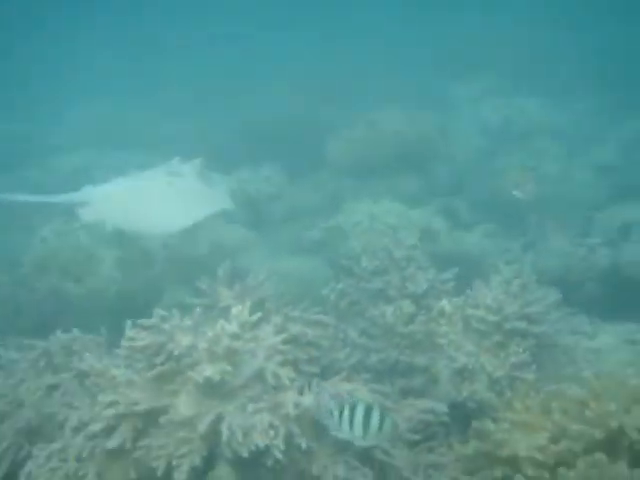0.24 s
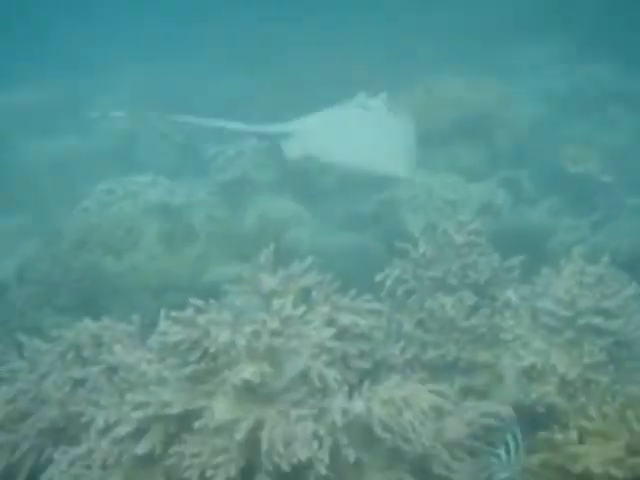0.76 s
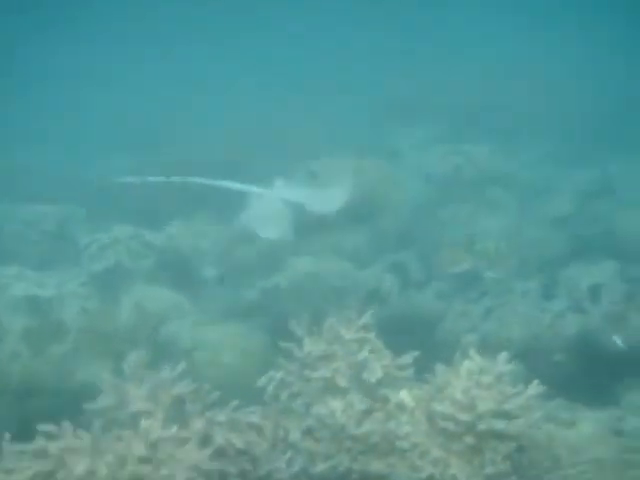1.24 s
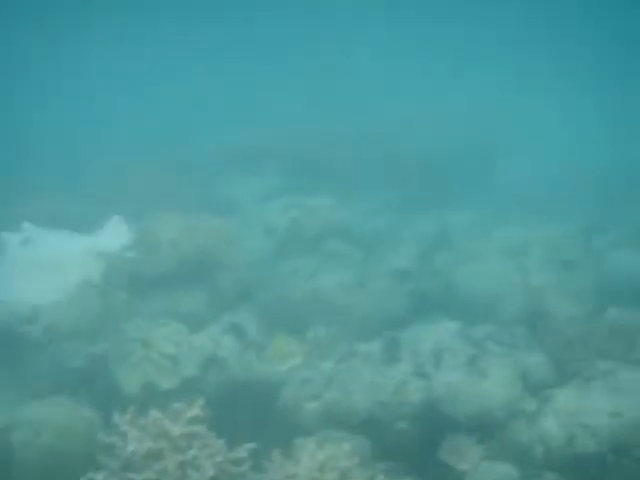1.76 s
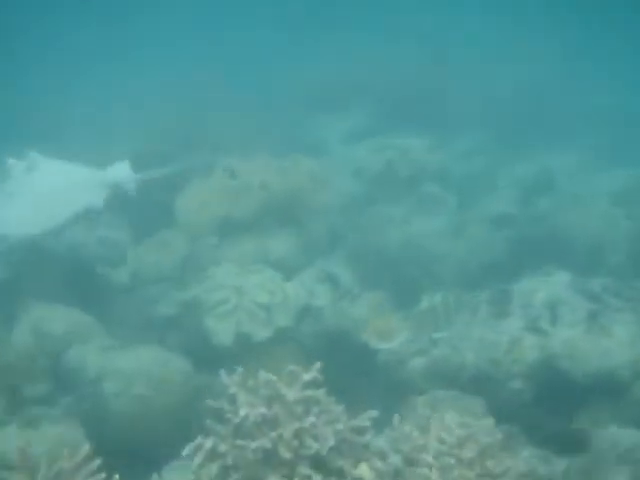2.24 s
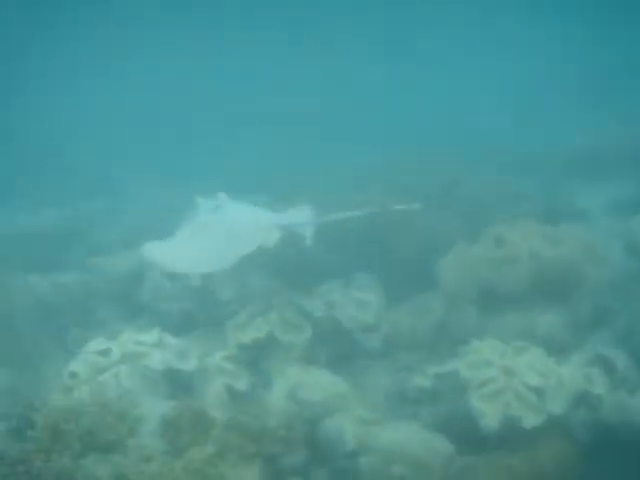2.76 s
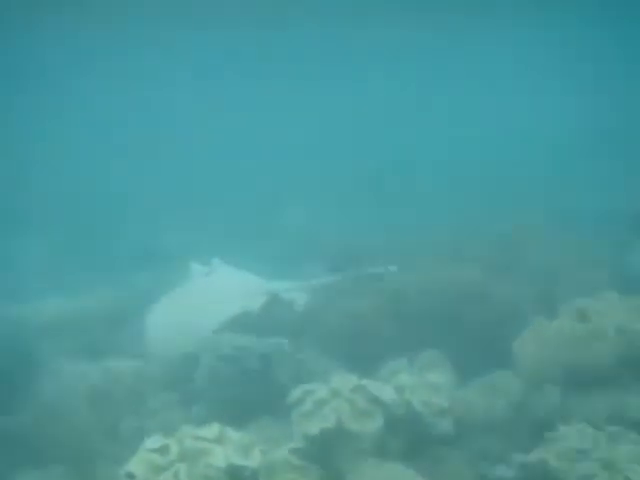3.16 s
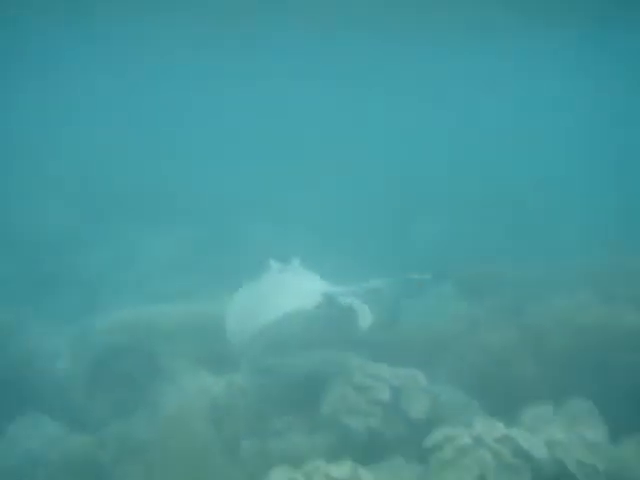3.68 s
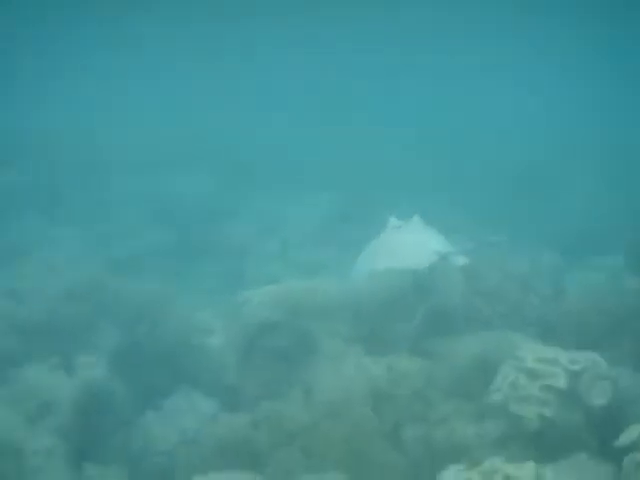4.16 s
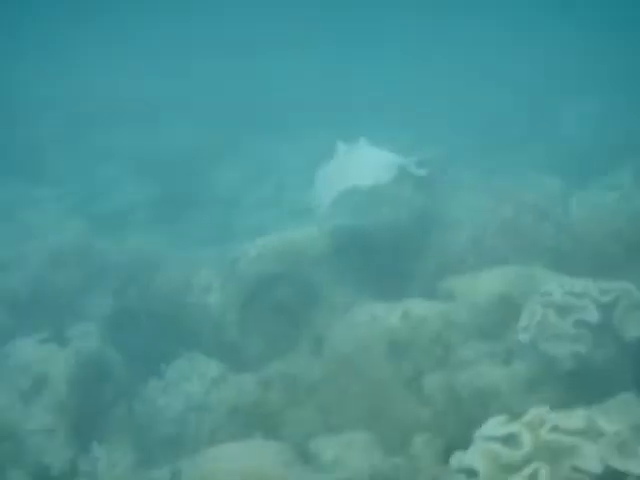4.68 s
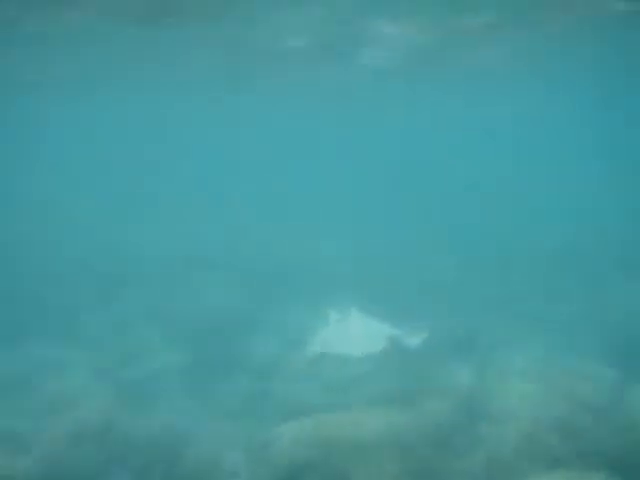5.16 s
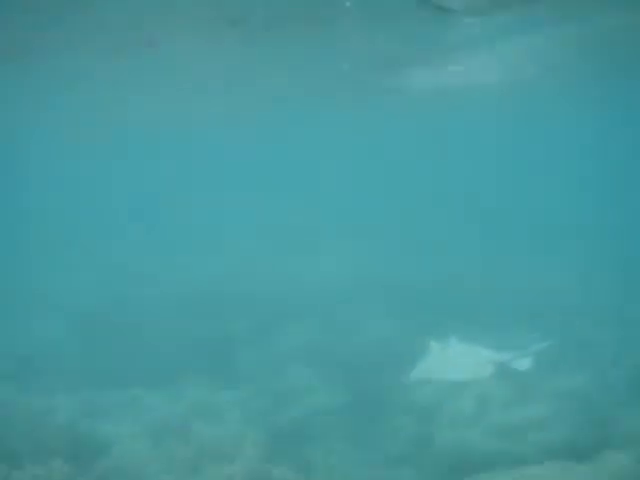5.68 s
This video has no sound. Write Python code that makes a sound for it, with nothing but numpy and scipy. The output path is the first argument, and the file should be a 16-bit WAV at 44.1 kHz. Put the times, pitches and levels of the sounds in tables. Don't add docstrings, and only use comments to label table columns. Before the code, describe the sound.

Dull low water noise surges around an enclosed underwater microphone, broken by soft thuds, bubbly plops, tiny snaps and a faint high whine.

```python
import sys
import numpy as np
from scipy import signal
from scipy.fft import rfft, irfft, next_fast_len
from scipy.io import wavfile
from scipy.ndimage import uniform_filter1d, minimum_filter1d, map_coordinates

SR = 44100
rng = np.random.default_rng(int(sys.argv[2]) if len(sys.argv) > 2 else 0)


def generate_wav(signal):
    frames = np.transpose(np.atleast_2d(signal))
    scaled = np.clip(frames, -1, 1) * 32767
    pcm = np.round(scaled).astype(np.int16)
    wavfile.write(sys.argv[1], SR, pcm)


def volts(x):
    e = np.asarray(x, float) / 20
    return 10 ** e


N = 261072


def unit(x):
    return x / np.sqrt(np.mean(x ** 2) + 1e-20)


def noise():
    return rng.standard_normal(N)


def curves(rows):
    s, *cols = np.transpose(rows)
    return [np.interp(np.arange(N) / SR, s, c) for c in cols]


def wobble(rate):
    knots = rng.standard_normal(int(N * rate / SR) + 4)
    return map_coordinates(knots, [np.arange(N) * rate / SR])


def filtered(x, response):
    m = next_fast_len(N + SR // 2)
    return irfft(rfft(x, m) * response(np.fft.rfftfreq(m, 1 / SR)), m)[:N]


def coloured(x, spectrum):
    f, db = np.transpose(spectrum)
    return unit(filtered(x, lambda hz: volts(np.interp(np.log(hz + 1), np.log(f), db))))


def resonant(x, modes):
    def response(f):
        total = 0
        for k, (centre, width, db) in enumerate(modes):
            damping = 1j * f * width
            total = total + (-1) ** k * volts(db) * damping / (centre * centre - f * f + damping)
        return total
    return unit(filtered(x, response))


def pushes(rate, spread_db):
    struck = rng.random(N) < rate / SR
    return unit(struck * noise() * volts(spread_db * rng.exponential(size=N)))


def rings(rows, rough=0.):
    lead = SR // 20
    out, waver = np.zeros(N + SR), np.pad(wobble(160), (0, SR))
    for row in rows:
        s, db, hz, t60, rise, bend, hold = (*row, 0, 0)[:7]
        t60, rise = np.clip(t60, 1 / 300, 1 / 3), np.clip(rise, 1 / 5000, 1 / 21)
        k = np.arange(-int(rise * SR), int((t60 + hold) * SR))
        t, at = k / SR, round(s * SR) + k
        shake = rough * waver[at + lead]
        swell = np.sin(np.pi / 2 * np.clip(1 + t / rise, 0, 1)) ** 2 * np.exp(6 * shake)
        decay = volts(db - 60 * np.maximum(t - hold, 0) / t60)
        pitch = hz * np.exp(np.clip(bend * t, -.5, .5) + shake)
        out[at + lead] += decay * swell * np.sin(2 * np.pi * np.cumsum(pitch) / SR)
    return out[lead:lead + N]


def necked(rows, rise_cycles):
    return [(s, db, hz, t60, rise_cycles / hz, bend) for s, db, hz, t60, bend in rows]


def popped(rows, bend):
    rise_1khz_s, size_law = 0.003514, 0.553
    return [(s, db, hz, t60, rise_1khz_s * (1000 / hz) ** size_law, bend) for s, db, hz, t60 in rows]


def swarm(count, low_hz, span_db, cycles):
    s, size, strength, glide = rng.random((count, 4)).T
    hz = low_hz * volts(span_db * size)
    rows = [s * N / SR, -14 * strength, hz, cycles / hz, 2.2 / hz, 40 * (glide - .5)]
    return unit(rings(np.transpose(rows)))


def patchy(x, depth_db):
    z = signal.stft(x, nperseg=512)[2]
    field = uniform_filter1d(rng.standard_normal(z.shape), size=7, axis=0)
    field = uniform_filter1d(field, size=30, axis=1)
    return signal.istft(z * volts(depth_db * unit(field)), nperseg=512)[1][:N]


# t/s, level/dB
SURGE = [(0.0, -42.5), (0.16, -44), (0.71, -34.5), (1.07, -41.5), (1.4, -45.5), (1.75, -48.5),
         (1.93, -43.5), (2.32, -44), (2.77, -43), (3.2, -49), (3.64, -46.5), (4.07, -39.5), (4.44, -44.5),
         (4.58, -37), (5.06, -41.5), (5.38, -37.5), (5.55, -38), (5.92, -41)]
# f/Hz, width/Hz, level/dB
CAVITY = [
    (388.2, 38.9, 7.5),
    (195, 78, -1.5),
    (275, 280, -30),
    (490, 74, -31),
]
# peak t/s, level/dB, f/Hz, t60/s
KNOCKS = [(0.205, -20.5, 325, 0.047), (0.158, -22, 340, 0.0053), (0.433, -28, 393, 0.026),
          (0.639, -22.5, 397, 0.085), (0.789, -14, 366, 0.09), (0.845, -18.5, 365, 0.11),
          (1.344, -24, 362.5, 0.25), (1.733, -16.5, 370, 0.094), (2.018, -16, 375, 0.017),
          (2.036, -15.5, 383, .035), (2.088, -7.5, 382, 0.055), (2.102, -11.5, 378, 0.067),
          (2.145, -20, 392, .03), (2.158, -15.5, 382, 0.08), (2.912, -23, 380, 0.046),
          (3.394, -20.5, 385, 0.088), (3.908, -21.5, 388, 0.04), (3.928, -14.5, 392, 0.024),
          (3.996, -19, 354, 0.078), (4.024, -22.5, 385, 0.029), (4.398, -21, 266, 0.11),
          (4.423, -22, 333, 0.021), (4.461, -11, 410, 0.018), (4.677, -26.5, 357, 0.098),
          (4.712, -17.5, 340, 0.038), (4.798, -20.5, 356, 0.092)]
# peak t/s, level/dB, f/Hz, t60/s, rise/s
SWELLS = [(1.087, -16.5, 200, .07, .007), (2.292, -25, 386, 0.047, 0.0068), (2.37, -22, 376, 0.046, .006),
          (5.877, -14.5, 360, 0.034, .007), (5.919, -21, 348, .05, 0.0075),
          (1.308, -15.5, 360, 0.024, .009), (0.117, -18.5, 363, 0.018, 0.007),
          (0.215, -21, 379, 0.065, 0.0049), (0.587, -33, 387, .026, .0213),
          (0.707, -18.5, 345, 0.095, 0.015), (0.74, -19, 360, 0.025, .0111),
          (0.891, -27.5, 348, 0.1, 0.016), (0.98, -24, 337, 0.015, 0.011),
          (2.481, -22.5, 391.6, 0.013, 0.035), (2.519, -17.5, 364, 0.042, 0.011),
          (3.593, -14.5, 363, 0.037, .012), (4.061, -8, 400, 0.014, 0.0073),
          (4.094, -19, 360, 0.054, 0.0095), (4.136, -11, 355, 0.04, 0.01327),
          (4.411, -28, 406.5, 0.14, 0.023), (4.49, -25, 397.4, 0.11, 0.014), (4.52, -23, 390, .05, 0.013),
          (4.7, -19, 372, 0.036, .012), (4.734, -28, 353, 0.019, .0134), (4.992, -23.5, 372, 0.036, .012),
          (5.24, -24.5, 401, 0.039, 0.026), (5.573, -34, 383, .047, 0.014), (5.748, -25, 385, 0.058, .0116)]


def air_space():
    boom_db, = curves(SURGE)
    drive = noise() * volts(.9 * wobble(14) + 1.9 * wobble(40))
    boom = volts(boom_db + 2.5) * resonant(resonant(drive, CAVITY), [(365, 370, 0)])
    knock_rise_s, give_way = 0.00441, .7
    blows = [(*row, knock_rise_s) for row in KNOCKS] + SWELLS
    struck = volts(-3.5) * rings(blows)
    filled = uniform_filter1d(abs(struck), size=300) / volts(boom_db)
    return boom / (1 + give_way * filled) + struck


CALM_DB = -42
# f/Hz, level/dB per Hz
SLOSH = [(12, -79.5), (20, -25), (70, -23.5), (124, -8), (200, -3.5), (247, -20.5), (300, 3.5), (390, -21),
         (660, -120)]


def slosh():
    level_db = -53.5 + 0.4 * (curves(SURGE)[0] - CALM_DB)
    return volts(level_db + 1.0) * unit(volts(1.2 * wobble(8.3)) * coloured(noise(), SLOSH))


# f/Hz, level/dB per Hz
FIZZ = [(290, -40.5), (500, -0.5), (765, -9.5), (1520, -7.5), (1980, -16), (2390, -6), (2740, -14),
        (3650, -16), (6020, -17.5), (7540, -14.5), (8130, -12), (8550, -19.5), (9930, -20.5),
        (12900, -64.5), (21800, -120)]
# f/Hz, width/Hz, level/dB
SHELL = [
    (2320, 230, 3.5),
    (3540, 420, 15.5),
    (6420, 1400, -3),
]
# t/s, level/dB
CRACKLE = [(0, -68.5), (1.05, -62), (1.4, -60), (1.75, -67), (1.99, -67.5), (2.3, -60), (2.69, -63),
           (3.33, -64), (3.8, -62.5), (4.3, -65.5), (4.6, -63), (4.88, -65.5), (5.2, -66), (5.92, -60.5)]


def reef_bed():
    fizz_db = -59 + 0.056 * (curves(SURGE)[0] - CALM_DB)
    flutter_db = .7 * wobble(12)
    hiss = volts(fizz_db + 3.0 + flutter_db) * coloured(noise(), FIZZ)
    ticks = pushes(rate=520, spread_db=1.1)
    crackle = volts(curves(CRACKLE)[0]) * resonant(ticks, SHELL)
    drifting = volts(.8 * wobble(2.5))
    return patchy(hiss + drifting * crackle, depth_db=1.7)


def drifting_bubbles():
    return volts(-65 + 2.5 * wobble(3.5)) * swarm(count=900, low_hz=1900, span_db=9, cycles=60)


def whine():
    whine_hz, frame_hz, rms_db = 8016, 30000 / 1001, -61.5
    since_frame = np.arange(N) / SR % (1 / frame_hz)
    return np.sqrt(2) * volts(rms_db) * np.sin(2 * np.pi * whine_hz * since_frame)


# peak t/s, level/dB, f/Hz, t60/s, pitch change/(1/s)
THUMPS = [(0.062, -26.5, 224, 0.023, -8), (0.539, -16, 325, 0.049, 2), (0.531, -48.5, 82, 0.14, 2),
          (0.633, -29, 195, 0.055, -6), (1.207, -55, 62, .193, 3), (1.493, -40.5, 147, 0.077, -8),
          (1.741, -27.5, 150, 0.075, 23), (1.837, -34.5, 178, 0.018, 5), (1.987, -41.5, 133, .33, -0.5),
          (2.103, -20, 253, 0.022, 0), (2.104, -35.5, 161, 0.17, 0), (2.292, -46.5, 77.7, 0.24, 21),
          (2.778, -38.5, 144, .22, -4), (3.397, -36, 136, 0.068, -13), (3.421, -49, 80, 0.37, 2.5),
          (3.87, -31.5, 172, 0.027, -10), (4.418, -24, 196, 0.1, -11.5), (4.589, -35.5, 115, 0.053, 1),
          (4.864, -30.5, 178, 0.048, 8), (4.977, -47.5, 70, .33, -1), (5.62, -42, 195, 0.25, -4.5),
          (5.75, -42, 180, 0.27, 1)]
# peak t/s, level/dB, f/Hz
LUMPS = [(0.175, -35.5, 227), (0.502, -24.5, 360), (0.572, -37, 544), (1.014, -37, 190), (1.29, -27.5, 370),
         (1.752, -30, 280), (2.001, -32.5, 252), (2.257, -32.5, 397), (2.278, -28.5, 367),
         (2.354, -30.5, 400), (2.551, -29.5, 388), (2.627, -29.5, 350), (2.76, -30, 322), (2.139, -34, 161),
         (2.416, -29, 387), (2.815, -27, 377), (2.826, -38, 175), (2.951, -44, 596), (3.398, -34.5, 240),
         (2.419, -36, 200), (3.869, -26, 582), (4.463, -29, 185), (4.45, -29, 320), (4.476, -27.5, 328),
         (4.507, -25.5, 400), (4.561, -25.5, 345), (4.583, -27, 337), (4.825, -37.5, 208),
         (4.841, -35.5, 181), (5.138, -41, 159), (5.234, -36, 211), (5.25, -35, 199), (5.351, -31, 192),
         (5.455, -32, 390), (5.677, -39, 200), (5.73, -35, 208), (5.848, -34, 189), (5.914, -27, 350),
         (3.275, -32.5, 384), (3.575, -28.5, 365), (3.675, -32, 383), (3.706, -28.5, 384), (0.13, -31, 404),
         (0.094, -29.5, 326)]


def slaps_and_eddies():
    eddy_t60_s, eddy_rise_cycles = 0.058, 3.477
    eddies = [(s, db, hz, eddy_t60_s, eddy_rise_cycles / hz) for s, db, hz in LUMPS]
    return volts(-0.5) * rings(necked(THUMPS, rise_cycles=2.15) + eddies, rough=0.013)


# peak t/s, level/dB, f/Hz, t60/s
CLINGING = [(0.073, -38.5, 2273, 0.026), (0.111, -34, 1547, 0.065), (0.149, -28.5, 580, 0.0061),
            (0.474, -41.5, 4520, 0.018), (0.53, -34, 1610, 0.025), (0.625, -36.5, 594, 0.0045),
            (1.304, -39, 690, 0.015), (1.73, -37.5, 590, 0.033), (2.135, -37, 1540, 0.031),
            (2.146, -38.5, 825, 0.05), (2.822, -38, 820, 0.048), (2.887, -49, 1454, 0.11),
            (3.392, -40, 646, 0.011), (3.847, -29.5, 1230, 0.027), (3.848, -30.5, 1720, 0.034),
            (3.848, -30, 590, 0.2), (3.928, -29.5, 1310, 0.052), (3.929, -39, 1710, .034),
            (4.012, -43, 1230, 0.034), (4.056, -43, 550, 0.018), (4.134, -35, 1546, 0.03),
            (4.451, -40, 4650, 0.0057), (4.468, -31.5, 1430, 0.037), (4.523, -36.5, 864, 0.075),
            (5.056, -34.5, 2270, 0.014), (5.523, -48, 1350, 0.11)]
# peak t/s, level/dB, f/Hz
SPECKS = [(0.108, -56, 5200), (0.115, -43, 6000), (0.122, -42, 4840), (0.298, -48, 5700),
          (0.454, -45, 3700), (0.468, -51, 4760), (0.469, -46, 2400), (0.485, -52, 5710),
          (0.486, -43.5, 3710), (0.52, -45, 4910), (0.526, -49, 5010), (0.719, -45, 4660),
          (1.208, -50, 3600), (1.222, -54, 4060), (1.277, -53, 3400), (1.43, -44, 2240), (1.438, -48, 4300),
          (1.463, -51, 4430), (1.537, -44, 2320), (1.99, -45, 5060), (1.994, -43, 3110), (1.997, -42, 5060),
          (2.019, -41, 3500), (2.025, -42, 3100), (2.078, -48, 3400), (2.106, -42, 2360),
          (2.117, -43, 1900), (2.124, -45, 2500), (2.135, -36, 3710), (2.243, -49, 4710),
          (2.363, -45, 3710), (2.893, -46.5, 4260), (3.077, -44.5, 1340), (3.608, -46, 3960),
          (3.831, -38, 3310), (3.831, -43, 2250), (3.853, -37, 2370), (3.855, -28.5, 1310),
          (3.856, -46, 3210), (3.91, -45, 3610), (3.926, -46, 2100), (3.983, -46, 4710), (4.425, -44, 1350),
          (4.426, -46, 3700), (4.437, -47, 4860), (4.444, -44, 4510), (4.445, -48, 2100),
          (4.46, -34.5, 1200), (4.47, -46, 4110), (4.48, -41, 2280), (4.616, -47, 1150), (5.81, -41, 4450),
          (5.863, -45.5, 3960)]
# peak t/s, level/dB, f/Hz, t60/s
MERGING = [(0.123, -29, 1140, 0.022), (0.124, -38, 2420, 0.018), (0.453, -42.5, 3060, 0.021),
           (0.484, -38.5, 2170, .015), (0.504, -39.5, 1350, 0.05), (0.738, -53, 550, 0.026),
           (1.026, -44.5, 786, 0.026), (1.652, -44.5, 2640, 0.012), (1.998, -35, 2290, 0.015),
           (2.018, -33.5, 1160, 0.025), (2.037, -31, 1334, 0.053), (2.035, -31.5, 2130, 0.025),
           (2.069, -54, 903, .013), (2.134, -37, 2490, 0.028), (2.157, -40, 1260, 0.03),
           (2.245, -37.5, 543, 0.12), (3.751, -43, 4730, 0.016), (3.848, -30.5, 2060, 0.018),
           (3.869, -21.5, 385, .033), (4.427, -44.5, 2890, 0.04), (5.044, -41, 3980, 0.016),
           (5.14, -46, 4360, .012)]
# peak t/s, level/dB, f/Hz, t60/s
ESCAPING = [
    (0.159, -47, 2160, 0.011),
    (0.483, -40, 540, 0.032),
    (2.103, -33, 760, 0.013),
    (2.414, -36, 638, 0.0095),
    (3.849, -23.5, 398, 0.003),
    (4.254, -32.5, 1140, 0.0079),
    (4.421, -42, 4580, 0.0079),
    (4.46, -31, 870, 0.0037),
    (5.81, -37.5, 3500, 0.0043),
]
# peak t/s, level/dB, f/Hz, t60/s, pitch change/(1/s)
GULPS = [(0.518, -28.5, 1283, 0.046, -9), (0.531, -22.5, 1113, 0.025, 3), (2.006, -48, 4650, 0.11, 10.5),
         (2.176, -44.5, 804, 0.1, -11), (3.87, -32.5, 1310, 0.015, 0), (3.872, -35, 1760, 0.034, 0),
         (3.938, -35.5, 700, 0.11, 6.5), (2.963, -46, 853, 0.13, -2), (4.216, -51, 2870, 0.051, 2),
         (4.572, -41, 850, 0.057, 2), (4.825, -41, 687, 0.025, 17), (4.902, -48.5, 694, 0.18, 8.5)]
# peak t/s, level/dB, f/Hz, t60/s, rise/s, pitch change/(1/s), hold/s
BIG_POPS = [
    (4.585, -17, 520, .07, .004, 6, 0.0012),
    (0.519, -8, 635, .03, .009, -11.5, .01),
]


def bubbles():
    speck_t60_s = .013
    held = CLINGING + [(*row, speck_t60_s) for row in SPECKS]
    pops = popped(MERGING, bend=-11.5) + popped(ESCAPING, bend=25) + popped(held, bend=1.2)
    return volts(1.5) * rings(BIG_POPS + necked(GULPS, rise_cycles=9.9) + pops, rough=0.017)


# t/s, level/dB, half length/s
WASHES = [(0.111, -41.5, 0.02), (1.598, -57.5, 0.078), (0.456, -56.5, 0.059), (0.528, -44, 0.019),
          (2.025, -47.5, 0.026), (2.115, -55, 0.039), (2.992, -55.5, 0.12), (3.857, -41.5, 0.016),
          (4.138, -45.5, .01), (4.465, -42.5, 0.017), (0.157, -46.5, 0.0098), (3.905, -55, 0.033)]


def froth():
    t = np.arange(N) / SR
    wash = sum(volts(db) * np.exp(-((t - s) / half) ** 2) for s, db, half in WASHES)
    spray = noise() + .7 * pushes(rate=720, spread_db=1.6)
    hiss = resonant(spray, [(966, 650, 4.0), (2450, 430, -15.0), (3900, 1500, -6.0)])
    grains = swarm(count=3500, low_hz=650, span_db=18, cycles=25)
    foam = resonant(hiss + .55 * grains, [(1400, 2600, 0)])
    hum = volts(-57) * np.exp(-((t - 4.56) / .16) ** 2) * resonant(spray, SHELL[:1])
    return wash * foam + hum


# t/s, peak level/dB, low part/dB, top part/dB
SNAPS = [(0.2596, -36, -9, -11.5), (0.2974, -35, -5.5, -23), (0.6075, -26.5, -15.5, -33),
         (0.7184, -39.5, -11.5, 2), (1.06, -45, 3.5, -10), (1.27, -44, -3.5, -19), (1.373, -41.5, -15, -19),
         (1.4809, -35, -9.5, -35.5), (1.729, -43.5, -12, -9.5), (1.9183, -36, -21, -13),
         (1.992, -40.5, 1.5, -17), (2.0172, -39.5, 1.5, -12.5), (2.135, -41.5, 6.5, -11.5),
         (2.7955, -34, -16, -11), (2.9193, -39.5, -22.5, -20), (3.075, -42.5, 8, -6),
         (3.3244, -41, -34, -12), (3.421, -46.5, 5, -27.5), (3.688, -34, -6, -18.5),
         (3.7402, -38, -6, -21.5), (3.773, -45, 3.5, -14.5), (3.8302, -50, 8, -6.5),
         (4.7085, -42.5, -7.5, -19), (4.744, -32.5, -15, -31.5), (4.778, -35.5, -15, -15.5),
         (5.4925, -37.5, -30, -14.5), (5.712, -44.5, -7, -10), (5.7273, -34.5, -13, -22.5),
         (5.8086, -42, -2, -10)]


def snaps():
    near, t = np.zeros(N + SR), np.arange(SR // 40) / SR
    edges = [5500, 7220], [2020, 3970], [8150, 9800]
    bands = [signal.butter(2, edge, "band", fs=SR) for edge in edges]
    envelope = volts(-60 * t / 0.022) * (1 - np.exp(-t / 0.000063))
    for s, db, low_db, top_db in SNAPS:
        jet = rng.standard_normal((3, len(t))) * envelope
        parts = [signal.lfilter(*band, burst) for band, burst in zip(bands, jet)]
        mix = volts([-3, low_db + 5.0, top_db + 4.5])
        snap = sum(gain * part / abs(part).max() for gain, part in zip(mix, parts))
        near[round(s * SR):][:len(t)] += volts(db) * snap
    return near[:N]


# t/s, length/s, from f/Hz, to f/Hz
EMPTY = [(0.308, 0.015, 5200, 7400), (0.574, 0.027, 4700, 9350), (0.618, 0.034, 5200, 7400),
         (0.723, 0.031, 4320, 9400), (1.044, 0.015, 5200, 6900), (1.279, 0.012, 5700, 7600),
         (1.492, 0.017, 4670, 8100), (1.744, 0.019, 6100, 7600), (1.898, 0.015, 5200, 7000),
         (1.925, 0.018, 5200, 7600), (2.033, 0.018, 4300, 5800), (2.771, 0.021, 4740, 7600),
         (3.059, 0.011, 2570, 7200), (3.08, 0.009, 3600, 7400), (3.434, 0.023, 4700, 5800),
         (3.668, 0.01, 4300, 7600), (3.7, 0.01, 4700, 6400), (3.757, 0.012, 4500, 7600),
         (3.818, 0.008, 1190, 2730), (3.827, .014, 1205, 1800), (3.81, 0.016, 8600, 9800),
         (4.678, 0.022, 6200, 7400), (4.717, 0.025, 5700, 7400), (4.767, 0.01, 5700, 8200),
         (5.472, 0.018, 5200, 7200), (5.554, 0.02, 6200, 7200), (5.686, 0.02, 5700, 7600),
         (5.734, 0.022, 5230, 8070), (5.793, 0.01, 4200, 6900), (5.816, 0.0093, 3100, 6900),
         (5.89, 0.02, 6100, 7200)]
# f/Hz, share
PATCH_SHARE = [(1500, 0), (3000, .01), (4800, .05), (5600, .17), (7500, .17), (7750, 0), (8250, 0), (8500, .12),
               (9500, .14), (10000, .3)]


def with_gaps(x, margin_db, from_hz):
    hz, t, z = signal.stft(x, SR, nperseg=512, noverlap=384)
    band = uniform_filter1d(abs(z) ** 2, size=13, axis=0)
    loudest = -minimum_filter1d(-band, size=15, axis=1)
    rows, cols = z.shape
    luck = np.repeat(rng.random(cols // 8 + 1), 8)[:cols]
    below_treble = np.clip(from_hz / (hz[:, None] + 1) - 1, 0, 9)
    need = volts(2 * (margin_db + 12 * luck + 24 * below_treble))
    draw = np.kron(rng.random((rows // 7 + 1, cols // 4 + 1)), np.ones((7, 4)))[:rows, :cols]
    quiet = band < 1.5 * np.median(band, axis=1, keepdims=True)
    share = np.interp(hz, *np.transpose(PATCH_SHARE))[:, None]
    kept = (band * need > loudest) & ~(quiet & (draw < 2 * luck * share))
    for s, length, low_hz, high_hz in EMPTY:
        during = abs(t - s - length / 2) < length / 2 + .002
        kept[np.ix_((hz > low_hz) & (hz < high_hz), during)] = False
    return signal.istft(z * kept, SR, nperseg=512, noverlap=384)[1][:N]


def scene():
    water = air_space() + slosh() + slaps_and_eddies()
    air = drifting_bubbles() + bubbles() + froth()
    return (water + air + reef_bed() + snaps() + whine())[None]


def roll_off(x):
    return signal.sosfilt(signal.butter(12, 10080, fs=SR, output="sos"), x)


def record(dry):
    limited = filtered(dry[0], lambda hz: hz < 10100)
    gapped = with_gaps(limited, margin_db=11, from_hz=5000)
    return roll_off(gapped[None])


dry = scene()
out = record(dry)
generate_wav(out)
```